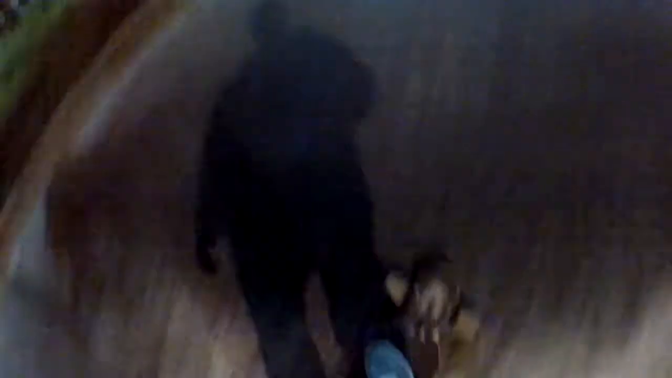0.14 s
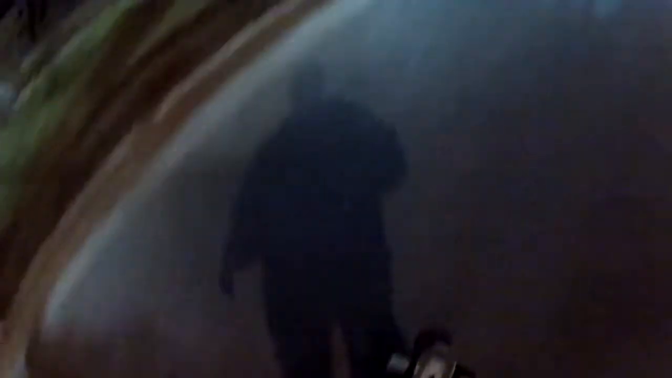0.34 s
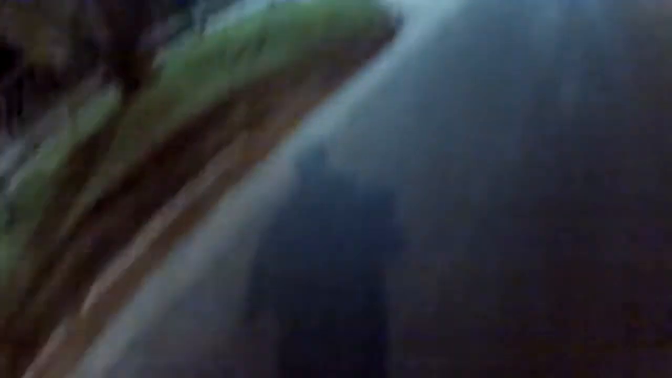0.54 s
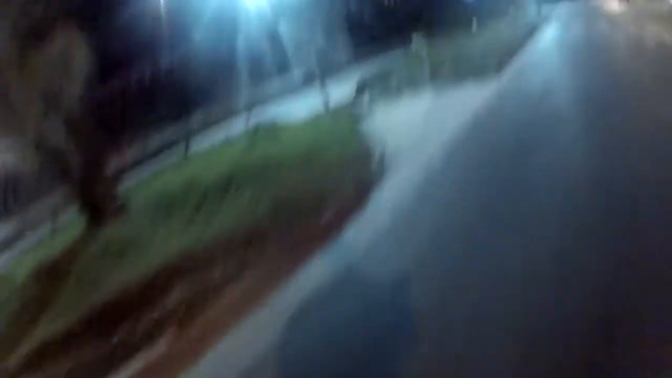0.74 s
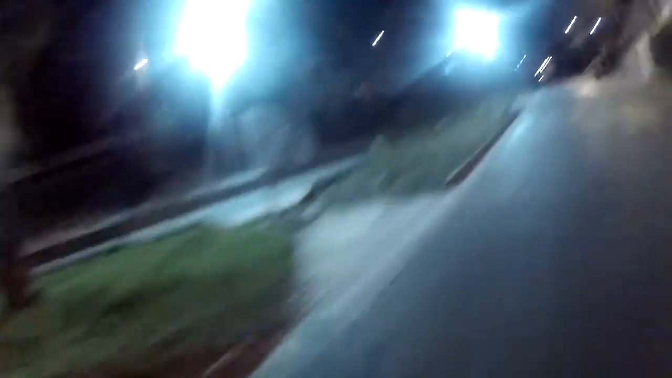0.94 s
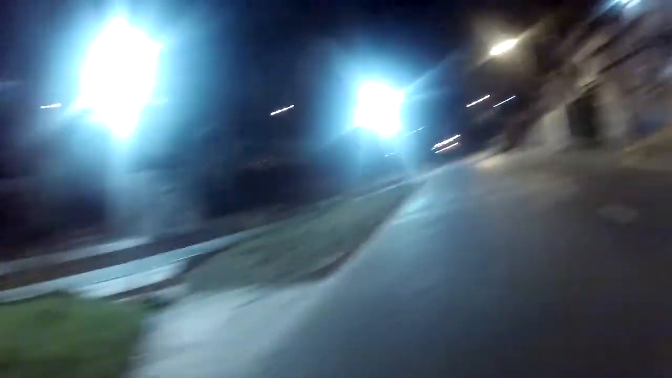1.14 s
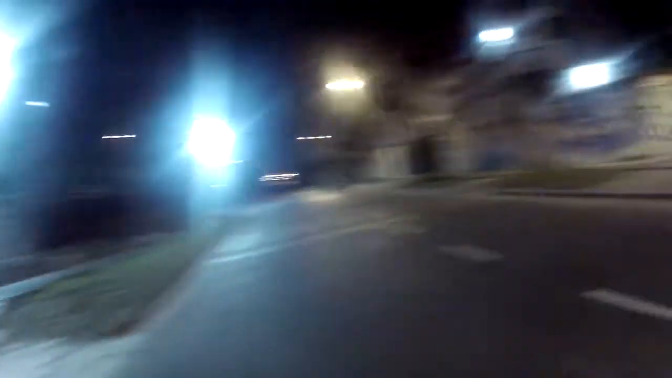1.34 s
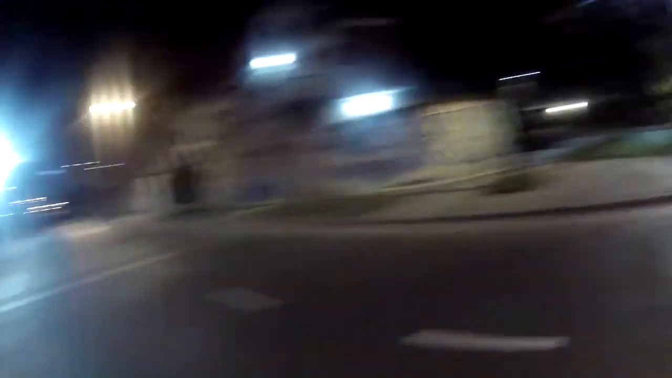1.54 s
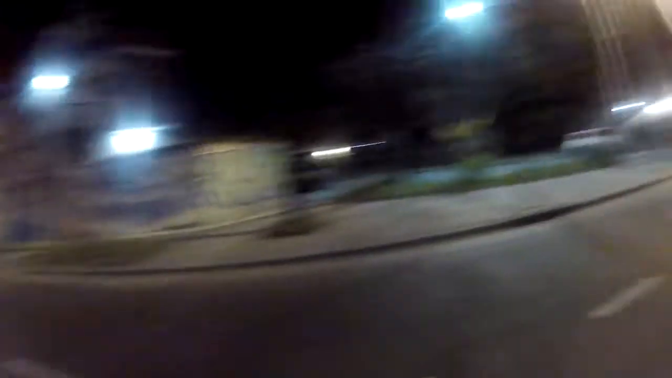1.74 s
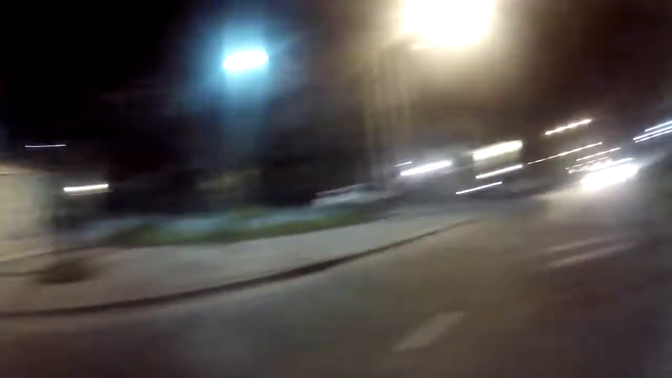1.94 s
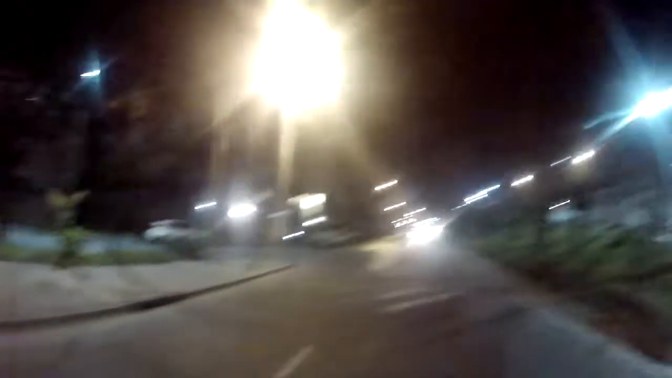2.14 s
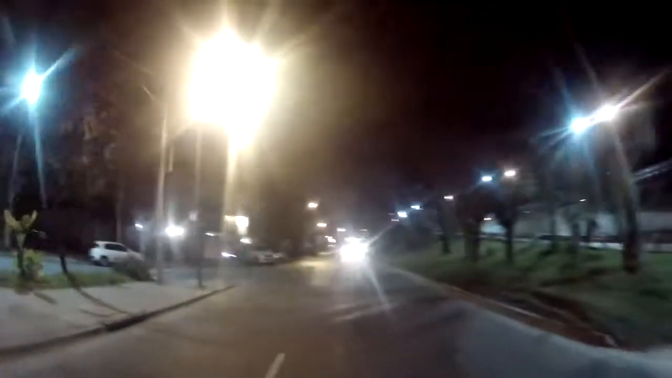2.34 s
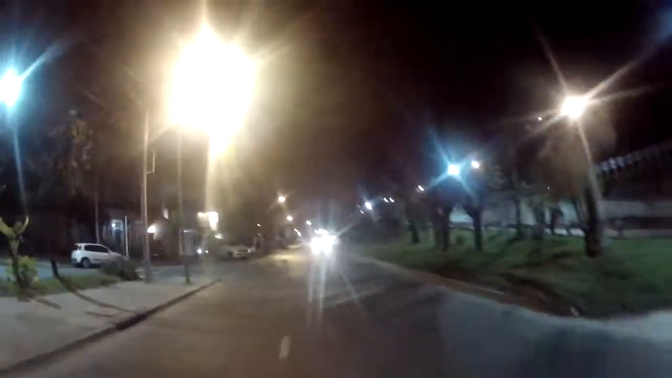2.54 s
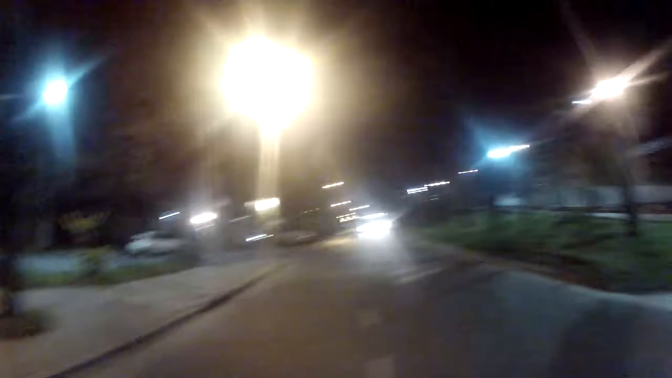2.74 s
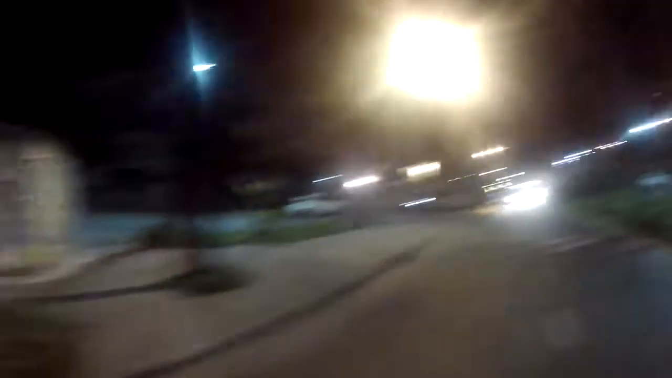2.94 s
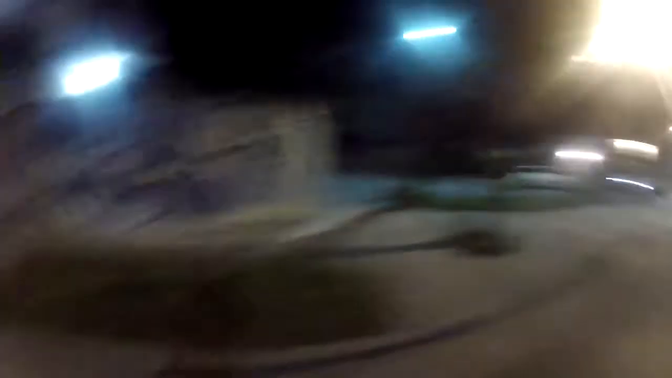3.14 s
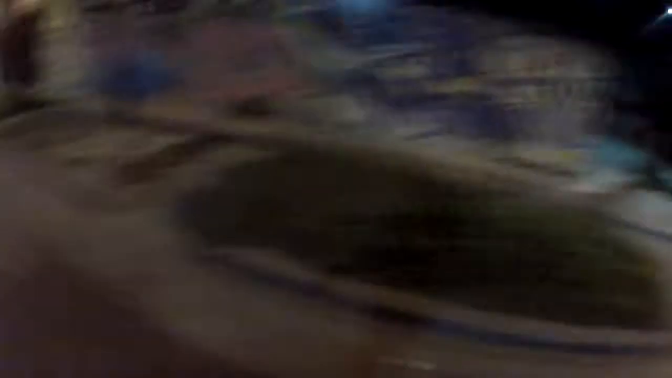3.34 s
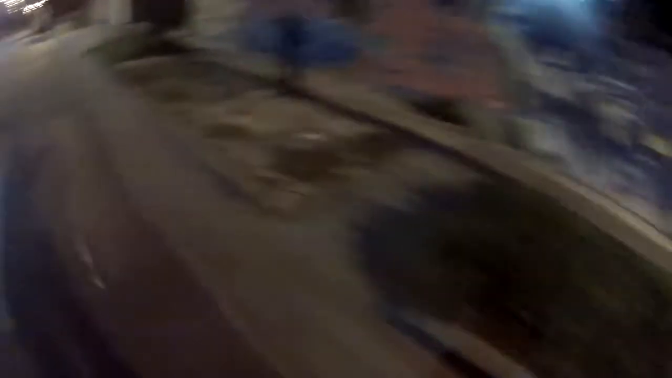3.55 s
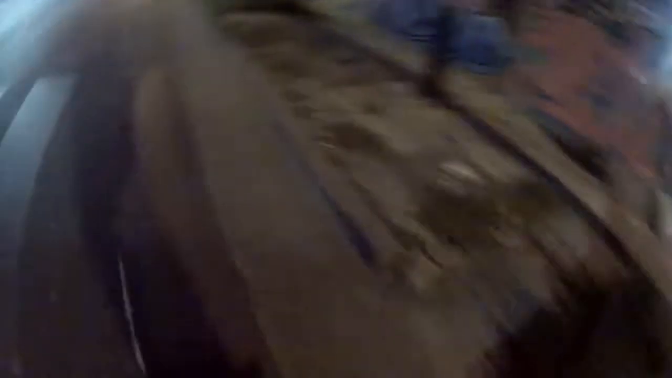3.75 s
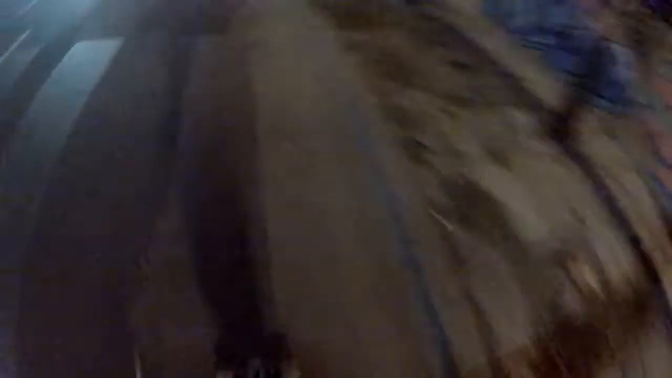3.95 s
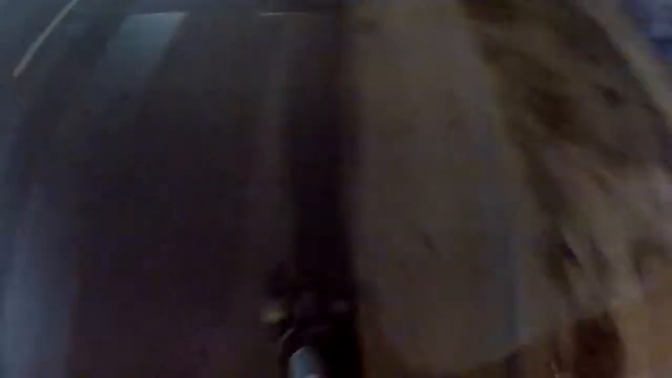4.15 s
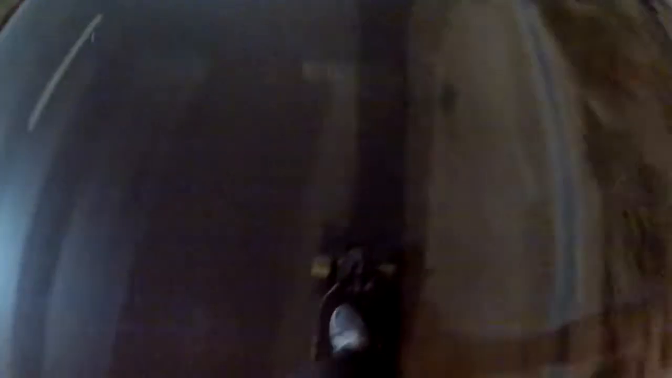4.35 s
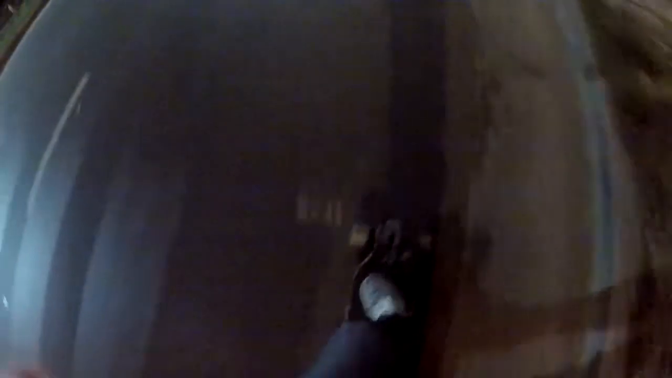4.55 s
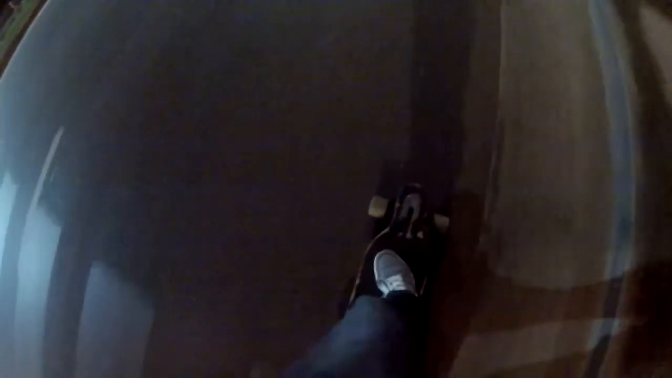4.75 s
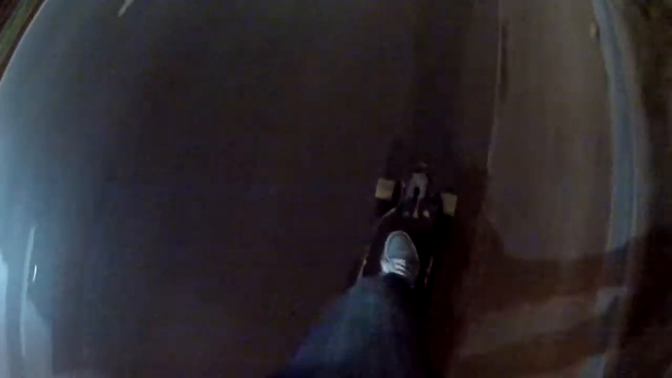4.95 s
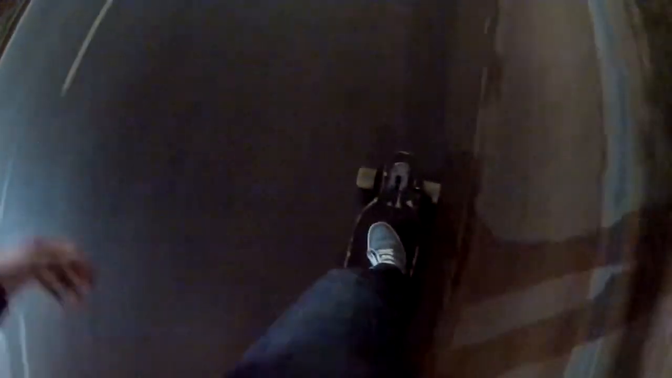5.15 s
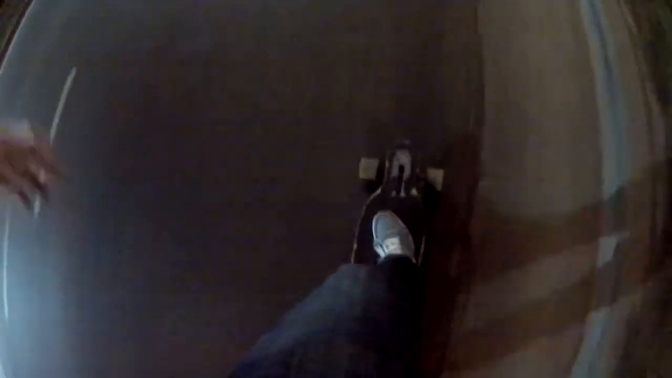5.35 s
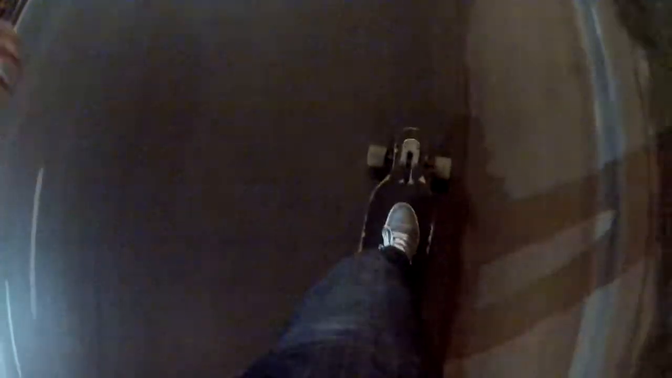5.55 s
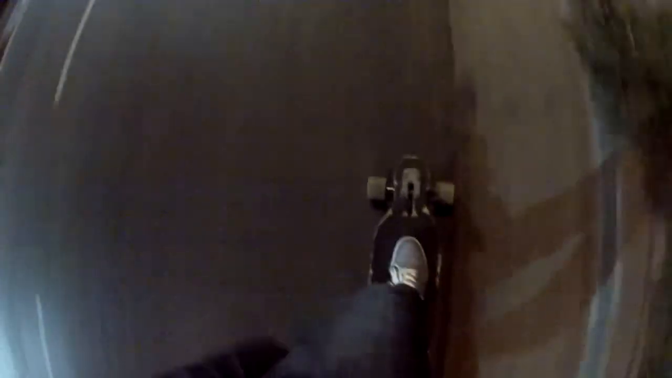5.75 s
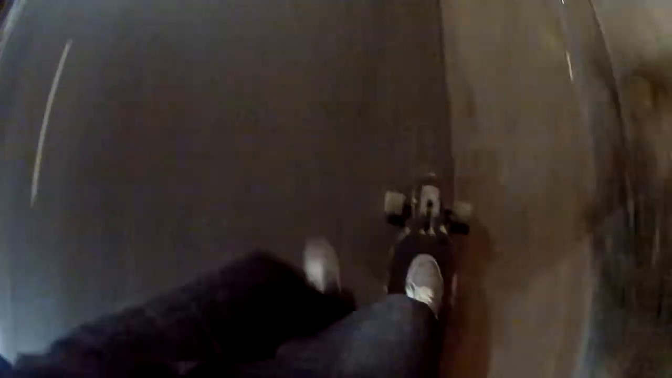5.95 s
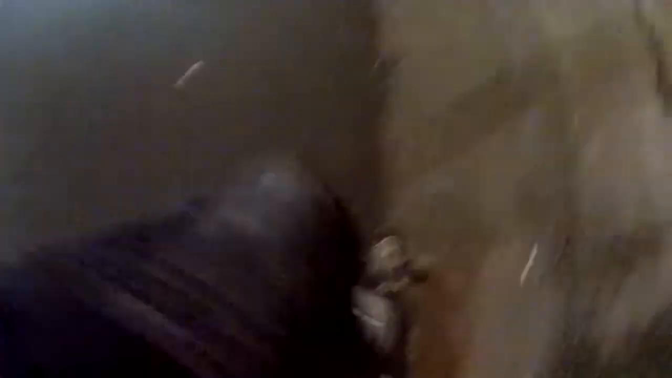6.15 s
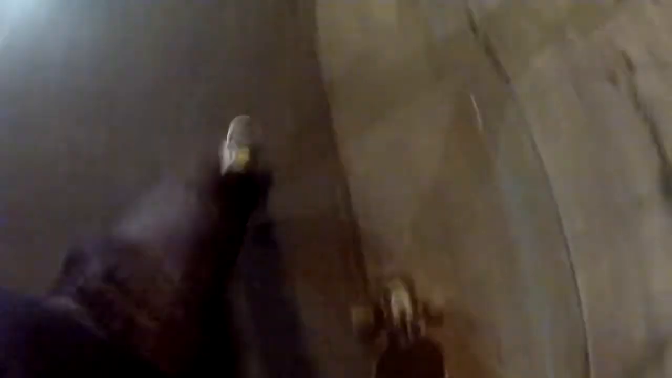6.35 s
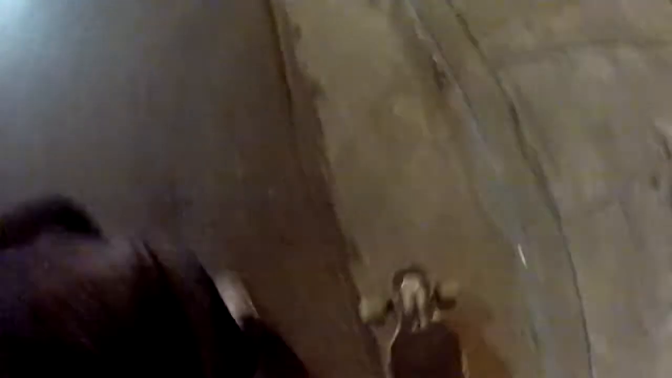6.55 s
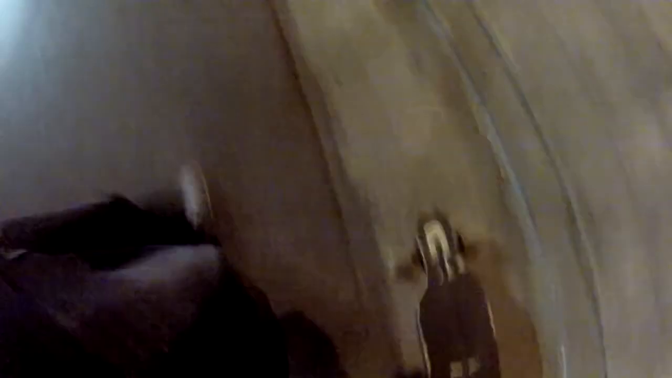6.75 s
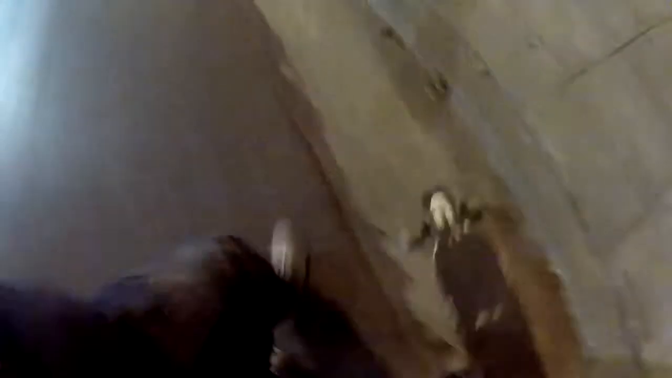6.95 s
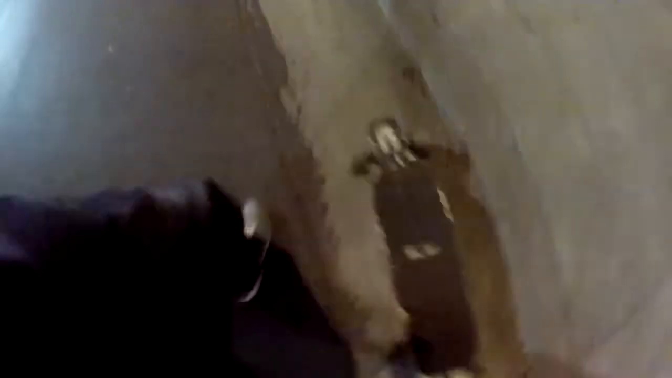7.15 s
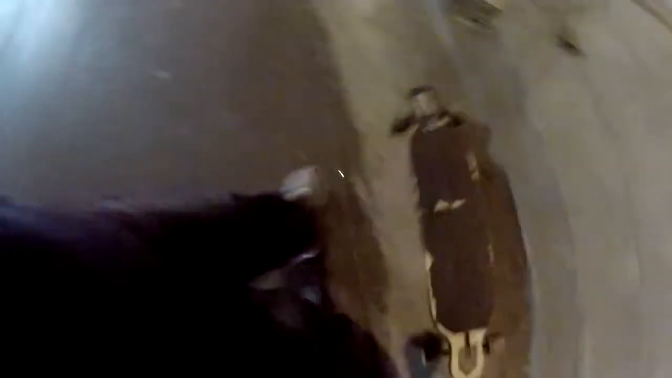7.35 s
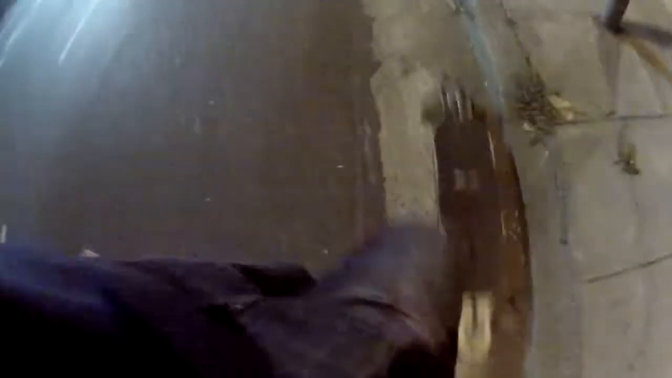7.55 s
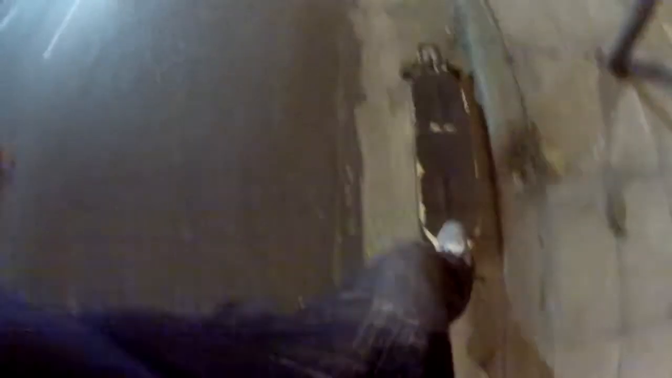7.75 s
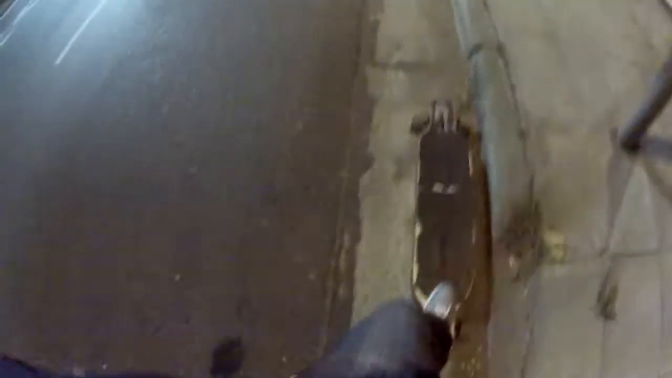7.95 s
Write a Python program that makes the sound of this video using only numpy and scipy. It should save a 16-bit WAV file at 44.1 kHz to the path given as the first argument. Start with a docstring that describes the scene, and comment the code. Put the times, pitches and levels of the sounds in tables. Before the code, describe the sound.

Skateboard wheels roll steadily on rough asphalt outdoors, muffled and grainy, with deep wind lumps against the microphone's plastic case. Loose parts tick now and then, with a brief clatter after one second and more around four. After six seconds the housing rings and rattles, metal axle and deck knock hard, grit rasps, a bearing squeals thinly, then the wheels fade under wind.

```python
"""Wind buffets a closed plastic camera housing worn on the head, while longboard wheels drone along a night street.
Grit scrapes and loose parts tick; then the rider steps off, runs beside the board and steps on again while a
bearing squeals and the housing rings once. Wind, road, rattle and grit are filtered noise, knocks ring resonances,
thumps are short dying swings, squeals and the housing ring are unsteady tones.
The sound is sampled at 12 kHz and held between samples."""
import sys
import numpy as np
from scipy import signal
from scipy.fft import rfft, irfft, next_fast_len
from scipy.io import wavfile

SR = 44100
rng = np.random.default_rng(int(sys.argv[2]) if len(sys.argv) > 2 else 0)


def digitize_waveform(pressure):
    """Quantize a signal to 16-bit integers and store it at the path in sys.argv[1].

    Rows of a 2-D input are taken as channels; values are limited to [-1, 1].
    """
    field = np.atleast_2d(pressure).T
    bounded = np.clip(field, -1, 1)
    quanta = np.round(bounded * 32767).astype(np.int16)
    wavfile.write(sys.argv[1], SR, quanta)


N = 353239  # length in samples, about 8 s

# tone colour of bare grit: pitch_hz, relative level_db (per Hz)
GRIT_SPECTRUM = [(500, -11), (1500, 3.5), (3000, -1), (4300, -3), (6000, -7.5)]


def from_db(db):
    """Turn decibels into a gain."""
    return 10 ** (np.asarray(db) / 20)


def rms_one(x):
    """Scale a signal to an rms (average strength) of 1."""
    return x / np.sqrt(np.mean(x ** 2) + 1e-20)


def in_time(rows):
    """Draw straight lines between table rows: one value per sample for each column after the time."""
    start_s, *columns = np.transpose(rows)
    time_s = np.arange(N) / SR
    return [np.interp(time_s, start_s, column) for column in columns]


def drift(corner_hz):
    """Smooth random wandering around 0 with spread 1; a higher corner wanders faster."""
    step = 20  # drawn at every 20th sample, then joined by straight lines
    r = np.exp(-2 * np.pi * step * corner_hz / SR)
    noise = rng.standard_normal(N // step + 4002)
    slow = signal.lfilter([1], [1, -2 * r, r * r], noise)[4000:]  # leave out the filter's start
    return np.interp(np.arange(N) / step, np.arange(len(slow)), rms_one(slow))


def coloured(x, spectrum):
    """Shape white noise with a spectrum that is cut to -90 dB beyond its ends; rms 1."""
    size = next_fast_len(N)
    hz, db = np.transpose(spectrum)
    log_hz = np.log(np.fft.rfftfreq(size, 1 / SR) + 1e-3)
    gain = from_db(np.interp(log_hz, np.log(hz), db, left=-90, right=-90))
    return rms_one(irfft(rfft(x, size) * gain, size)[:N])


def gritty(per_s, spread_db, share):
    """Smooth white noise mixed with random single grains of uneven size; share is the grains' power."""
    size_db = spread_db * np.minimum(rng.exponential(1, N), 5)
    sizes = from_db(size_db) * rng.choice([-1, 1], N)
    grains = rms_one(sizes * (rng.random(N) < per_s / SR))
    share = np.clip(share, 0, 1)
    return np.sqrt(share) * grains + np.sqrt(1 - share) * rng.standard_normal(N)


def resonate(x, modes):
    """Ring several resonances side by side, with alternating signs; wider ones die faster."""
    out = 0
    for k, (hz, width_hz, db) in enumerate(modes):
        r = np.exp(-np.pi * width_hz / SR)
        poles = [1, -2 * r * np.cos(2 * np.pi * hz / SR), r * r]
        rung = signal.lfilter([1 - r, 0, r - 1], poles, x)
        out = out + (-1) ** k * from_db(db) * rung
    return out


def spell(start_s, swell_s, hold_s, peak_db, sag_db):
    """Gain of one tone or scrape: it swells, sags while held, then dies away."""
    swell_from_db, release_db_per_s = -27.5, 500  # the swell starts this far under its top
    top_s = start_s + max(swell_s, .002)
    end_s = top_s + max(hold_s, .002)
    end_db = peak_db - sag_db
    rows = [(start_s - .01, -120), (start_s, peak_db + swell_from_db), (top_s, peak_db), (end_s, end_db),
            (end_s + 1, end_db - release_db_per_s)]
    return from_db(in_time(rows)[0])


def wind(level_db):
    """Low buffeting on the housing: deep noise whose strength wanders in lumps."""
    # tone colour of the wind: pitch_hz, relative level_db (per Hz)
    wind_spectrum = [(10, -18.5), (18, -0.5), (50, -3), (100, -9), (170, -14), (260, -19), (420, -29),
                     (900, -72)]
    lumps = from_db(1.96 * drift(25.0))
    return from_db(level_db) * coloured(lumps * rng.standard_normal(N), wind_spectrum)


def wheels(wheel_db, hum_db):
    """Rough asphalt shakes the wheels and makes the deck hum; the same bumps drive both."""
    # tone colour of the wheel drone: pitch_hz, relative level_db (per Hz)
    drone_spectrum = [(120, 1), (220, 0.5), (300, -2), (420, -1.5), (520, -7), (640, -75), (1000, -45)]
    # tone colour of the humming deck: pitch_hz, relative level_db (per Hz)
    hum_spectrum = [(250, -18), (430, -20.5), (482, -5), (674, 2), (893, -8.5), (1070, -8.5), (1400, -38),
                    (1820, -68), (3080, -120)]
    bumps = from_db(2.4 * drift(30.0))
    road = bumps * gritty(600.0, 1.7, share=0.15)
    drone = from_db(wheel_db) * coloured(road, drone_spectrum)
    hum = from_db(hum_db) * coloured(road, hum_spectrum)
    return drone + hum


def knocks():
    """Each tick or knock is a sharp contact and a dying chatter that ring four groups of resonances."""
    # knocks and ticks: start_s, level_db, thing struck, length_ms
    knock_rows = [(0.864, -52, "strap", 3), (0.938, -42.5, "mount", 4.4), (1.098, -45, "mount", 3),
                  (1.128, -47, "mount", 4.3), (1.315, -43, "mount", 3), (1.343, -32, "headgear", 7.3),
                  (1.364, -26, "truck", 2.9), (1.378, -54, "mount", 2.7), (1.404, -36, "mount", 1.8),
                  (1.416, -36.5, "mount", 6.4), (1.394, -42, "truck", 4), (1.437, -27, "wheel", 3.5),
                  (1.52, -44.5, "deck", 3), (1.558, -44.5, "deck", 1.4), (2.017, -47.5, "strap", 5),
                  (2.407, -44, "mount", 3), (2.664, -22, "wheel", 1.6), (3.397, -46, "mount", 3),
                  (3.414, -43, "mount", 3.4), (3.448, -44.5, "mount", 3), (3.492, -47.5, "mount", 3.3),
                  (3.576, -39, "mount", 4.1), (3.652, -48, "mount", 4.3), (3.906, -38.5, "mount", 3),
                  (3.95, -30, "mount", 4.9), (3.973, -44, "housing", 2.8), (4.161, -40, "housing", 6),
                  (4.167, -33.5, "headgear", 13), (4.182, -41.5, "mount", 5.7),
                  (4.226, -32.5, "board", 2.6), (4.446, -27.5, "mount", 2.6), (4.789, -48, "mount", 3.3),
                  (4.978, -54, "truck", 2.3), (6.106, -42, "mount", 2.5), (6.187, -25.5, "truck", 3.4),
                  (6.197, -38, "housing", 9.2), (6.21, -36, "truck", 3.2), (6.237, -41, "mount", 2.7),
                  (6.252, -30.5, "housing", 9.8), (6.301, -26, "housing", 2.8),
                  (6.307, -29.5, "housing", 5), (6.352, -45.5, "deck", 2.8), (6.405, -40.5, "mount", 2.6),
                  (6.466, -17, "truck", 3.8), (6.488, -34, "mount", 5.2), (6.518, -30.5, "housing", 4.9),
                  (6.574, -38.5, "housing", 5.1), (6.588, -39, "truck", 3.2), (6.637, -7, "board", 2.9),
                  (6.651, -32, "housing", 3.5), (6.742, -45.5, "deck", 1.2), (6.789, -18, "housing", 3),
                  (7.082, -38.5, "housing", 3.4), (7.138, -33.5, "truck", 5), (7.181, -39.5, "deck", 1),
                  (7.201, -38, "mount", 14), (7.285, -30, "housing", 4.3), (7.361, -28.5, "housing", 3.8),
                  (7.41, -46, "deck", 3.3), (7.434, -41.5, "housing", 8.3), (7.554, -25, "housing", 4),
                  (7.619, -37, "housing", 5.8), (7.676, -37, "housing", 1.9), (7.722, -35, "mount", 2.6),
                  (7.744, -32, "mount", 3.2)]
    # how strongly each thing rings the groups: deck_db, truck_db, housing_db, thin_db (added to the knock's level)
    struck = {"mount": (-20.5, -19.5, -9, -10.5), "housing": (-25.5, -17.5, -3.5, -21),
              "truck": (-35, -11, -9.5, -16), "deck": (-4, -32, -24, -13),
              "board": (-10, -18.5, -20.5, -14.5), "wheel": (-21.5, -14.5, -18, -15),
              "strap": (-17, -9, -17, -7.5), "headgear": (-8.5, -25, -11.5, -22)}
    # resonances of the deck: pitch_hz, width_hz, relative level_db
    deck_modes = [(660, 130, 0), (400, 250, -10), (1180, 200, -14)]
    # resonances of the truck (wheel axle): pitch_hz, width_hz, relative level_db
    truck_modes = [(1580, 190, -0.71), (1957, 240, -1.3)]
    # resonances of the housing: pitch_hz, width_hz, relative level_db
    housing_modes = [(2411, 167, 5.6), (2841, 500, 3.66), (2949, 325, 3.5)]
    # thin high ringing: pitch_hz, width_hz, relative level_db
    thin_modes = [(3000, 574, 4), (3840, 415, 3), (4600, 1200, -6)]
    rise_ms, contact, contact_hz, boost_db = 0.71, 10.23, 3500, 6.5
    size = 3000  # samples given to each knock
    out = np.zeros(N + size)
    rows = np.array([(s, db, *struck[thing], ms) for s, db, thing, ms in knock_rows])
    ms = np.arange(size) / SR * 1000
    length_ms = np.maximum(rows[:, 6:], .1)
    fade = np.exp(-ms / length_ms) * (1 - np.exp(-ms / rise_ms))
    chatter = 0.36 * rng.standard_normal((len(rows), size)) * fade
    chatter[:, :1] -= contact / length_ms  # short blows are mostly one hard contact
    lowpass = signal.butter(2, contact_hz, fs=SR, output="sos")
    soft = signal.sosfilt(lowpass, chatter)  # heavy parts feel it dulled
    blow = soft * np.exp(-ms / 2.0)  # the deck answers mainly the first moment
    groups = ((deck_modes, blow), (truck_modes, soft), (housing_modes, soft), (thin_modes, chatter))
    for column, (modes, drive) in enumerate(groups):
        rung = resonate(drive + 1e-18, modes)
        peak = from_db(rows[:, 1] + rows[:, 2 + column] + boost_db)
        rung *= (peak / np.abs(rung).max(axis=1))[:, None]
        for start_s, one in zip(rows[:, 0], rung):
            first = round(start_s * SR)
            out[first:first + size] += one
    return out[:N]


def thumps():
    """Dull thumps through the rider's body: a push or pull with a quick front that swings back and dies."""
    # thumps: start_s, peak_db, pitch_hz, first swing
    thump_rows = [(1.344, -33.5, 72.4, "pull"), (1.609, -34.5, 52.7, "push"), (2.015, -30, 67.5, "push"),
                  (2.663, -39.5, 165, "push"), (3.423, -38, 42, "pull"), (4.228, -27, 197, "push"),
                  (4.228, -31, 52.7, "pull"), (4.296, -27, 154, "pull"), (4.435, -37, 90, "pull"),
                  (4.461, -33.5, 83, "pull"), (4.981, -40.5, 145, "push"), (6.191, -31.5, 240, "push"),
                  (6.209, -33, 23.8, "push"), (6.269, -37, 26, "pull"), (6.469, -25.5, 232, "push"),
                  (6.636, -34, 63, "push"), (6.644, -28.5, 33.5, "pull"), (6.818, -35, 25, "push"),
                  (7.049, -26, 255, "push"), (7.232, -35.5, 59, "pull"), (7.555, -39.5, 31.8, "pull"),
                  (7.615, -39, 80, "push")]
    fade_cycles, rise_cycles, lead_rad = 0.53, 0.037, 0.69
    size = 8000  # samples given to each thump
    out, t = np.zeros(N + size), np.arange(size) / SR
    for start_s, db, hz, swing in thump_rows:
        front = 1 - np.exp(-t * hz / rise_cycles)
        push = front * np.sin(2 * np.pi * hz * t + lead_rad) * np.exp(-t * hz / fade_cycles)
        sign = 1 if swing == "push" else -1
        first = round(start_s * SR)
        out[first:first + size] += sign * from_db(db) * push / push.max()
    return out[:N]


def squeals_and_ring():
    """Rough, wavering tones: high bearing squeals near 3900 Hz and one lower ring of the housing near 2400 Hz."""
    # squeals and the housing ring: start_s, swell_s, hold_s, level_db, sag_db (over the hold), pitch_hz
    tone_rows = [(6.14, 0.028, 0.2, -72, -3, 3910), (6.225, 0.051, 0.13, -44, 9, 2390),
                 (6.41, 0.027, 0.16, -65, -4, 3990), (6.803, 0.044, 0.03, -54, 9, 3920),
                 (7.085, 0.037, 0.13, -53.5, -4, 3920), (7.492, 0.044, 0.32, -45.5, 26, 3890)]
    waver_hz = 28.0  # typical size of the pitch wander
    waver = 2 * np.pi * np.cumsum(waver_hz * drift(113.0)) / SR
    roughness = rms_one(1.4 + drift(35))  # the strength often drops away
    t = np.arange(N) / SR
    tones = 0
    for *shape, hz in tone_rows:
        tones = tones + spell(*shape) * np.sin(2 * np.pi * hz * t + waver)
    return np.sqrt(2) * roughness * tones  # the root of 2 gives a sine rms 1


def scrapes():
    """Grit dragged under shoe and wheels: dense grains catch unevenly and ring board and housing."""
    # scrapes: start_s, swell_s, hold_s, gain_db (at the top), sag_db (over the hold), sound, high ringing_db
    scrape_rows = [(1.322, 0.026, 0.24, -53.5, 8, "broad", -2.5),
                   (3.676, 0.045, 0.24, -62, 1.5, "ringing", -28),
                   (3.938, 0.035, 0.021, -52.5, 7, "ringing", -18),
                   (4.205, 0.018, 0.15, -61.5, -0.5, "broad", -6),
                   (4.38, 0.052, 0.21, -58, 20.5, "broad", -6.5),
                   (6.785, 0.02, 0.063, -49.5, 14, "broad", 1),
                   (6.899, 0.084, 0.064, -38, 15, "ringing", -1.5),
                   (7.243, 0.016, 0.049, -58.5, 1.5, "ringing", 6),
                   (7.7, 0.029, 0.04, -54.5, 3, "ringing", -21)]
    # what each sound of scrape excites: low_db, middle_db, housing_db
    scrape_colours = {"broad": (-0.5, 2.9, -61), "ringing": (-1.5, -5, -0.5)}
    # low, middle, housing and high resonances, each a list of: pitch_hz, width_hz, relative level_db
    rubbed_groups = [
        [(610, 600, 5), (1180, 320, 0)],
        [(1954, 1700, 0)],
        [(2580, 240, 0)],
        [(3780, 800, 12), (5040, 290, 8)],
    ]
    grains = from_db(2.9 * drift(33.0)) * gritty(800.0, 2.75, share=0.5)
    # ringing each group twice sharpens its resonances
    rung = [rms_one(resonate(resonate(grains, modes), modes)) for modes in rubbed_groups]
    rasp = 0.7 * coloured(grains, GRIT_SPECTRUM)  # the bare grains, heard beside the ringing
    out = np.zeros(N)
    for *shape, sound, high_db in scrape_rows:
        mix = from_db([*scrape_colours[sound], high_db])
        out += spell(*shape) * (mix @ rung + rasp)
    return out


def rattle(level_db):
    """The housing buzzes on its mount in short uneven bursts of grainy noise."""
    # tone colour of the rattle: pitch_hz, relative level_db (per Hz)
    rattle_spectrum = [(710, -9), (1200, -14.5), (1410, -32.5), (1710, -7), (2060, -14), (2450, 2.5),
                       (2990, -10.5), (3220, -29), (4460, -16), (4960, -23), (5370, -16.5), (5900, -62),
                       (7670, -56), (13000, -120)]
    bursts = from_db(1.5 * drift(21.0))
    return from_db(level_db) * coloured(bursts * gritty(300, 4.5, share=0.18), rattle_spectrum)


def steady_grit():
    """A faint, steady background of grit: dense random grains in smooth noise."""
    return from_db(-69.5) * coloured(gritty(2000.0, 2.9, share=0.21), GRIT_SPECTRUM)


def scene():
    """All sources reach one microphone; the two channels differ only by a faint flicker."""
    # the ride: start_s, wind_db, wheel drone_db, deck hum_db, housing rattle_db
    ride = [(0.0, -58, -57, -58.5, -60), (0.49, -56.5, -60, -63.5, -71.5), (0.8, -58, -63, -66, -67.5),
            (1.18, -59.5, -62, -57, -59), (1.43, -52, -55.5, -60, -59), (1.76, -57.5, -65, -67, -62),
            (2.1, -57, -62, -70.5, -68), (2.63, -55.5, -66, -71.5, -65), (3.19, -56.5, -63.5, -70.5, -68.5),
            (3.43, -52, -69.5, -67, -64), (3.84, -60, -58.5, -69.5, -60), (4.42, -55.5, -61, -69, -71),
            (4.64, -56.5, -61, -69.5, -67.5), (5.49, -58.5, -57.5, -69, -66), (5.82, -61, -63, -72, -68.5),
            (6.16, -52.5, -64.5, -70, -65), (6.38, -56.5, -62, -60.5, -56), (6.8, -47.5, -63, -61, -58.5),
            (7.4, -57, -60, -63.5, -59), (7.61, -58, -60.5, -66.5, -56), (7.85, -53.5, -65.5, -70.5, -62.5),
            (8.01, -52.5, -72, -72, -71.5)]
    wind_db, wheel_db, hum_db, rattle_db = in_time(ride)
    noises = wind(wind_db) + wheels(wheel_db, hum_db) + rattle(rattle_db) + steady_grit() + scrapes()
    mono = noises + knocks() + thumps() + squeals_and_ring()
    flicker = from_db(-25.5) * drift(210.0) * noises
    return np.array([mono + flicker, mono - flicker])


def record(dry):
    """Sampling slowly and holding each value mirrors the sound around that rate, under a sinc slope."""
    hold_hz, cutoff_hz = 12000, 16700
    lowpass = signal.cheby2(10, 40, hold_hz / 2 + 500, fs=SR, output="sos")
    low = signal.sosfilt(lowpass, dry)
    mirrored = low * (1 + 2 * np.cos(2 * np.pi * hold_hz * np.arange(N) / SR))
    size = next_fast_len(N + 4096)
    hz = np.fft.rfftfreq(size, 1 / SR)
    slope = np.sinc(hz / hold_hz)  # the hold lasts one coarse sample
    held = irfft(rfft(mirrored, size) * slope, size)[:, :N]
    return signal.sosfilt(signal.cheby2(12, 70, cutoff_hz, fs=SR, output="sos"), held)


dry = scene()
out = record(dry)
digitize_waveform(out)
```